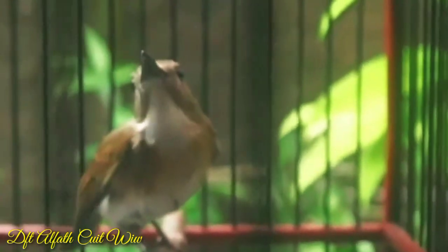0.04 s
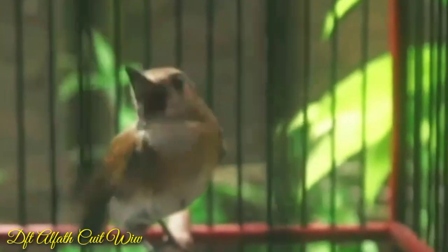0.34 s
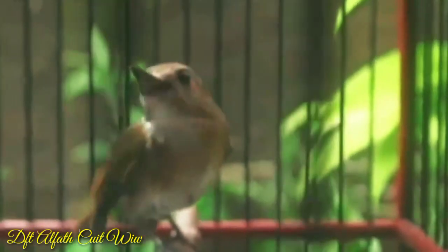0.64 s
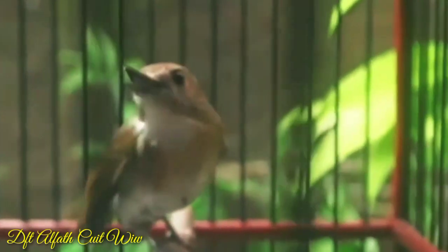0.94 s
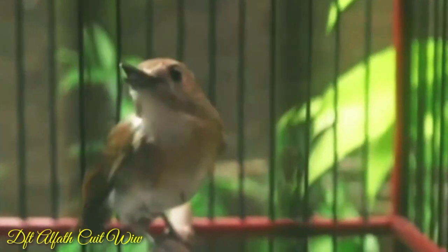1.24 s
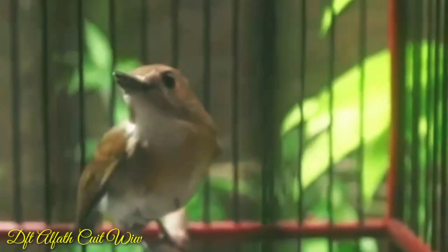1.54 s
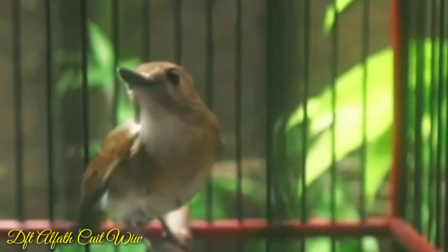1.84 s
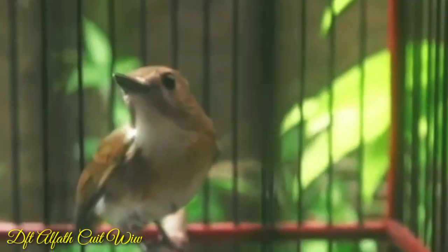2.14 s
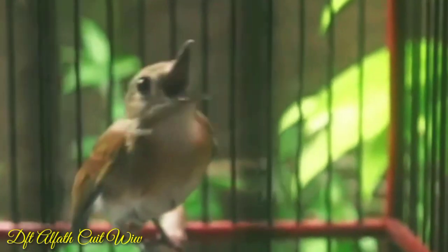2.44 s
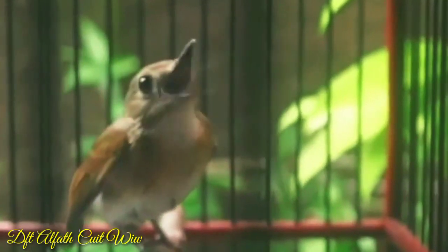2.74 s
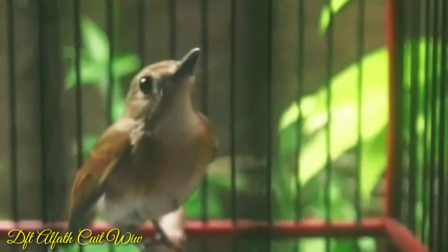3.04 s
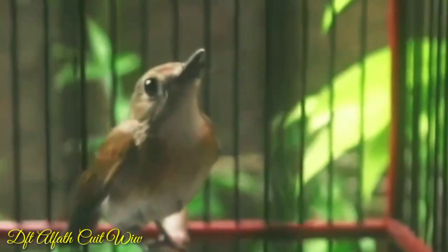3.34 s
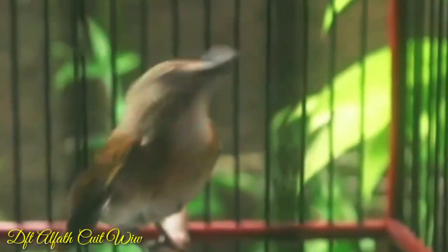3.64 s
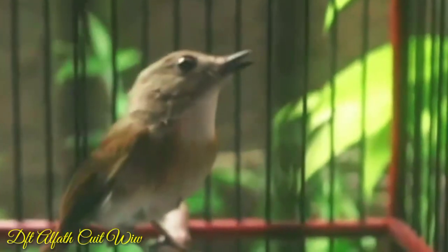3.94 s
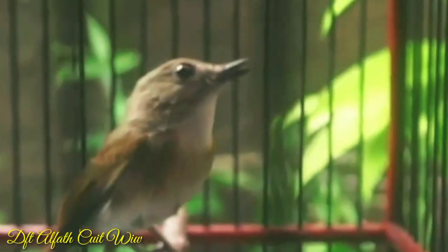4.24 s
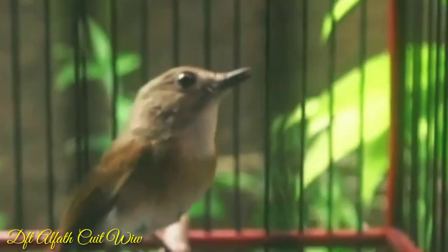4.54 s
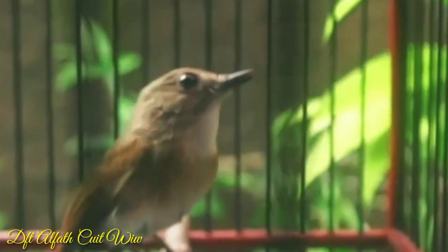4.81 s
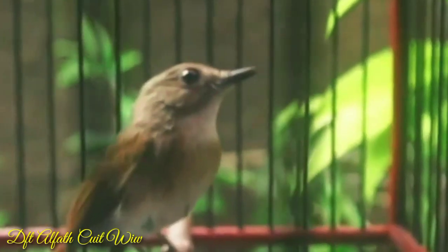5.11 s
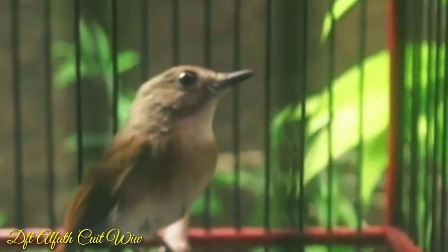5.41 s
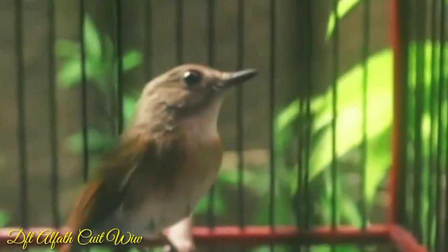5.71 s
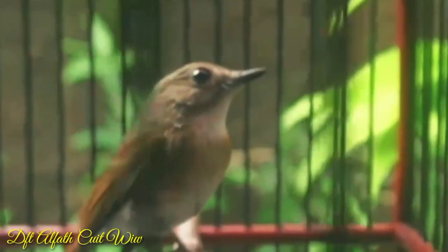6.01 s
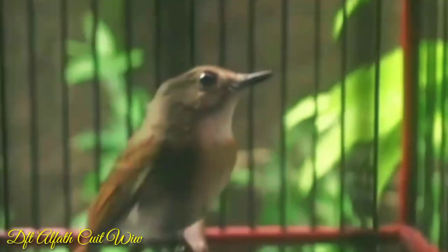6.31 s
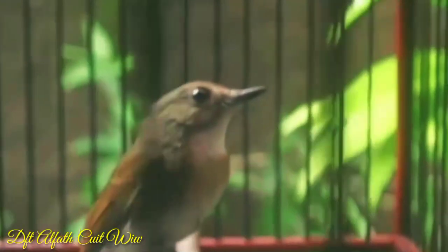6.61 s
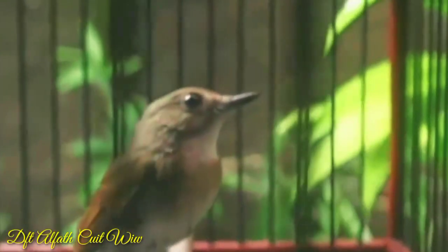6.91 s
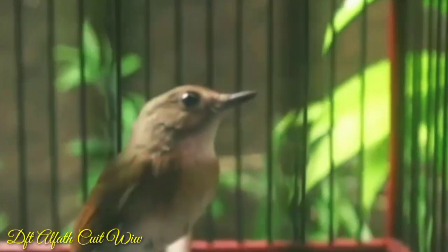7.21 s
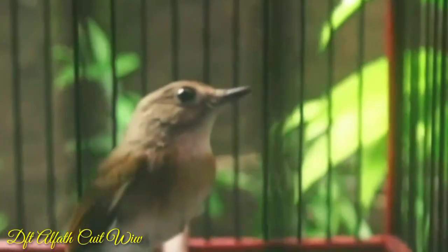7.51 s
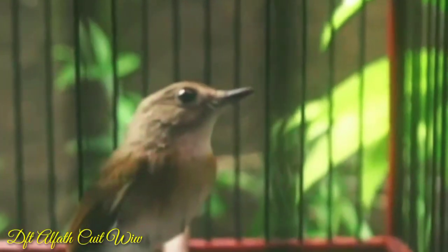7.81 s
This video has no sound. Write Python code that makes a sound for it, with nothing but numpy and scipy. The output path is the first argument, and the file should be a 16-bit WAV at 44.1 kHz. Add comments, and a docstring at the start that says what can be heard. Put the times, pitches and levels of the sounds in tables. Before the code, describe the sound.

Close, varied songbird phrases of whistles, warbled slurs and chirps end in a descending run, leaving a soft outdoor rush and faint calls.

```python
"""A yard, with a small caged songbird close by. Its syrinx makes a nearly pure tone whose changing pitch gives
whistles, a high buzz, warbled slurs, sharp chips and a long falling series; a few low, ringing chups sound
between its phrases. Cage and walls reflect each note, and the loudest overload the microphone. Other birds call
farther off; small rustles sound, and the soft background rush is heard louder once the song has ended."""
import sys
import numpy as np
from scipy import signal
from scipy.fft import rfft, irfft, next_fast_len
from scipy.io import wavfile

SR = 44100
rng = np.random.default_rng(int(sys.argv[2]) if len(sys.argv) > 2 else 0)


def unload_audio(sound):
    """Save the sound as a 16-bit wav file, at the path given as the first command line argument."""
    columns = np.transpose(np.atleast_2d(sound))
    # keep every value between -1 and 1, then stretch to whole-number steps
    steps = np.round(np.clip(columns, -1, 1) * 32767)
    wavfile.write(sys.argv[1], SR, steps.astype(np.int16))


N = 346626
TIME = np.arange(N) / SR

# Opening whistles. Each row: start and length in seconds, first and held pitch in Hz, time of the step,
# attack and release in seconds, relative level in dB, wobble in Hz, first sag in Hz/s, glide in seconds.
OPENING_WHISTLES = [(0.0, .07, 3660, 3820, 0.031, 0.044, 0.034, -6, 46, 1000, .006),
                    (0.132, .094, 3544, 2900, .04, 0.023, .025, -8.5, 100, 5000, .005),
                    (.27, .13, 2194, 2983, 0.035, 0.086, .05, -1.5, 15, 12000, 0.0063),
                    (0.426, 0.14, 1865, 3049, 0.037, .075, 0.078, -1, 10, 16000, 0.0082)]
# Lead-in and long note of the buzz. Each row: time in seconds, pitch in Hz, relative level in dB.
BUZZ_LEAD_IN = [(0.631, 7050, -9), (0.642, 7154, 1), (0.657, 7050, 0), (0.69, 8320, -0.5),
                (0.712, 8500, -17.5)]
BUZZ_LONG_NOTE = [(0.735, 7670, -14.5), (0.773, 8146, -3), (0.839, 8380, -10), (0.875, 8470, -5),
                  (0.915, 8860, -10), (0.975, 8485, -5), (0.989, 8770, -7), (0.995, 8820, -13)]
# Low, clean slurs. Each row: start and length in seconds, first and last pitch of the rise in Hz,
# attack in seconds, relative level in dB.
SCOOP_NOTES = [(1.053, .053, 3480, 4690, 0.039, 1), (1.345, .052, 4030, 4404, 0.035, -1),
               (1.605, .07, 3674, 4286, 0.037, -5)]
# Steep, fluttering slurs. Each row: as for the low slurs.
UPSWEEP_NOTES = [(1.163, 0.034, 5500, 6500, 0.0034, 1), (1.213, 0.056, 5320, 7710, 0.024, -1),
                 (1.41, 0.029, 4980, 6290, 0.0053, 1), (1.489, 0.057, 5270, 7280, 0.011, -3.5),
                 (1.688, 0.051, 4200, 5950, 0.025, -1), (1.774, .052, 4990, 7200, 0.018, -2.5)]
# Low chups, each a quick step down. Each row: start and length in seconds, first and held pitch in Hz,
# time of the step in seconds, relative level in dB.
CHUP_NOTES = [(2.116, 0.059, 3370, 2616, 0.02, -8.5), (2.235, .083, 2990, 2625, 0.04, -14),
              (2.427, 0.048, 3270, 2630, .016, -8)]
# Softer returns of a chup's held pitch. Each row: delay in seconds, gain in dB.
CHUP_RETURNS = [(.02, -11.5), (.052, -4.5)]
# Arched chips. Each row: start, length and rise time in seconds, first, top and last pitch in Hz,
# relative level in dB, flutter depth as a share of the pitch.
CHIP_NOTES = [(2.642, 0.075, .04, 4636, 7850, 6860, -1, .065),
              (2.795, 0.019, .01, 4620, 5480, 4780, 1.5, 0.04),
              (2.807, 0.045, 0.024, 4895, 8170, 6250, 0.5, 0),
              (2.95, 0.046, 0.028, 5180, 8144, 6750, -0.5, 0.0028),
              (3.087, 0.048, 0.025, 5760, 8400, 6800, -0.5, 0.0047),
              (3.439, 0.055, 0.025, 5500, 8790, 7450, -0.5, 0.0022),
              (3.619, 0.049, .026, 5590, 8900, 7470, -1, 0.008)]
# Syllables of the closing series. Each row: start and length in seconds, relative level in dB.
CLOSING_SYLLABLES = [(3.776, 0.064, -25), (3.824, .11, -15.5), (3.979, 0.041, -18), (4.018, 0.065, -15),
                     (4.064, 0.11, -9), (4.253, 0.033, -14.5), (4.287, 0.052, -13.5), (4.334, 0.061, -9),
                     (4.391, 0.042, -5.5), (4.504, 0.067, -10.5), (4.573, 0.061, -7.5),
                     (4.631, 0.055, -4.5), (4.742, 0.047, -9), (4.788, 0.057, -11.5), (4.846, 0.056, -8),
                     (4.9, 0.072, -9), (5.013, 0.043, -8.5), (5.061, 0.061, -14), (5.123, 0.046, -7.5),
                     (5.163, 0.04, -12), (5.198, 0.048, -5.5), (5.278, 0.03, -5)]
# The sinking line they follow. Each row: time in seconds, pitch in Hz.
CLOSING_PITCH = [(3.775, 3910), (3.83, 3625), (3.995, 3646), (4.045, 3263), (4.27, 3207), (4.42, 3085),
                 (4.65, 2952), (4.81, 2840), (4.93, 2850), (5.1, 2810), (5.31, 2769)]
# How throat and beak pass overtones. Each row: frequency in Hz, relative gain in dB.
THROAT_RESPONSE = [(4200, -6), (5800, -27.5), (9000, -33.5), (12000, -27), (15000, -30)]
# Air rushing through the beak. Each row: frequency in Hz, relative spectral density in dB.
BREATH_SPECTRUM = [(30, 6), (1000, -9.5), (5000, 1), (7000, -0.5), (10000, -2), (15000, -10.5)]
# Reflections from near surfaces. Each row: left and right delay in seconds, gain in dB.
REFLECTIONS = [(.0021, 0.0052, -23), (.0063, .0057, -18), (0.026, 0.024, -23), (.058, 0.064, -35.5)]
# Faint calls, and a soft falling flick under the songbird's first chip. Each row: start and length in
# seconds, first, middle and last pitch in Hz, relative level in dB, jitter in Hz, third harmonic in dB.
FAINT_CALLS = [(.225, 0.072, 1500, 1718, 1560, -36, 86, -10),
               (1.536, 0.29, 3475, 3305, 3233, -34.5, 20, -11),
               (2.207, 0.06, 1836, 1688, 1680, -34.5, 28, -9),
               (2.679, 0.037, 4990, 3920, 3100, -27.5, 110, -12),
               (2.749, 0.048, 1790, 1752, 1690, -33, 29, -12),
               (4.675, 0.062, 6570, 8390, 7500, -30, 400, -11),
               (6.533, 0.046, 1520, 1910, 2300, -35, 90, -8),
               (6.648, 0.043, 7930, 8220, 8640, -24.5, 116, -12),
               (6.817, 0.097, 1630, 2204, 2560, -36, 182, -8),
               (6.903, 0.12, 3513, 3468, 3368, -19.5, 17, -4.5),
               (7.07, 0.14, 3320, 3293, 3266, -18.5, 16.4, -5),
               (7.527, 0.09, 2206, 2052, 1606, -23, 38, 2.5)]
# One neighbour's dropping calls. Each row: start and length in seconds, relative level in dB.
DROPPING_CALLS = [(2.404, 0.11, -28), (2.975, 0.11, -39), (5.688, .095, -39), (6.127, .085, -33)]
# Rustles and scratches. Each row: start and length in seconds, band centre in Hz, level in dB.
SCRAPES = [(0.411, 0.019, 5560, -33.5), (0.642, 0.02, 1300, -37), (5.677, 0.083, 800, -39.5),
           (6.228, 0.028, 875, -35), (6.657, 0.023, 720, -36), (6.761, 0.052, 1040, -38),
           (7.307, 0.027, 5750, -33), (7.649, 0.022, 860, -29), (7.682, 0.031, 1770, -36),
           (7.78, 0.063, 5700, -30.5)]
# Sharp ticks. Each row: start in seconds, peak level in dB.
DRY_TICKS = [(5.308, -25), (6.581, -17.5), (7.344, -9), (7.36, -22), (7.732, -20)]
# Course of the outdoor rush. Each row: time in seconds, base levels of rumble and of air in dB.
RUSH_LEVELS = [(0, -55.5, -46), (2.299, -49.5, -46.5), (3.3, -56, -52), (4.598, -50, -45.5),
               (5.598, -48, -43), (7.86, -41, -34)]
# Its two spectra. Each row: frequency in Hz, relative spectral density in dB.
RUMBLE_SPECTRUM = [(15, -48), (25, -9), (43, -9), (112, 4), (257, -8), (313, -9.5), (350, -25.5),
                   (460, -37), (770, -120)]
AIR_SPECTRUM = [(200, -0.5), (700, -0.5), (1500, -0.5), (3000, -0.5), (6000, -5), (9000, -9.5),
                (15000, -13)]


def song_and_chups():
    """Modulated tones: the songbird's phrases, and a few low, ringing chups between them."""
    air = coloured(BREATH_SPECTRUM, side_db=-21.5)[0]
    out = ringing_chups(air)
    out += phrase([stepped(*row) for row in OPENING_WHISTLES], air, gain_db=-.5,
                  overtone_db=1, tilt_db=2.5, hiss_db=-41.5, jitter=.0083, shimmer_db=1.3)
    out += phrase([buzz(BUZZ_LEAD_IN), buzz(BUZZ_LONG_NOTE)], air, gain_db=1,
                  overtone_db=-12, tilt_db=-6, hiss_db=-49.5, jitter=.008, shimmer_db=1.6, pulse=119.5)
    out += phrase([scoop(*row) for row in SCOOP_NOTES], air, gain_db=0,
                  overtone_db=-5.5, tilt_db=-1, hiss_db=-42, jitter=.009, shimmer_db=2)
    out += phrase([upsweep(*row) for row in UPSWEEP_NOTES], air, gain_db=-.5,
                  overtone_db=-15.5, tilt_db=-6.5, hiss_db=-39, jitter=.012, shimmer_db=2.64, pulse=37)
    out += phrase([chip(*row) for row in CHIP_NOTES], air, gain_db=-.2,
                  overtone_db=-8, tilt_db=-5.5, hiss_db=-33, jitter=.007, shimmer_db=2.55)
    out += phrase([syllable(*row) for row in CLOSING_SYLLABLES], air, gain_db=.5,
                  overtone_db=-3, tilt_db=1.1, hiss_db=-40, jitter=.0043, shimmer_db=2.6)
    return out


def phrase(notes, air, gain_db, overtone_db, tilt_db, hiss_db, jitter, shimmer_db, pulse=0):
    """Coupled modulation: flutter moves pitch and level together, by pulse dB per unit of swing."""
    tone, airflow = np.zeros((2, N))
    for start, hz, effort, swing in notes:
        pitch = hz * (1 + swing + jitter * drift(397.7, len(hz)))
        effort = effort * from_db(gain_db + pulse * swing + shimmer_db * drift(161, len(hz)))
        add(tone, start, effort * whistle(pitch, overtone_db, tilt_db))
        add(airflow, start, effort)
    return tone + from_db(hiss_db) * airflow * air


def whistle(hz, overtone_db, tilt_db, rasp_radians=.22):
    """Source and filter: a near sine whose faint, raspy overtones are coloured by the throat."""
    phase = 2 * np.pi * np.cumsum(hz) / SR
    throat_hz, throat_db = np.transpose(THROAT_RESPONSE)
    out = np.sin(phase)
    for k in range(2, 6):
        db = np.interp(k * hz, throat_hz, throat_db) + overtone_db + tilt_db * (k - 5.5)
        gain = from_db(db) * (k * hz < SR / 2)
        out += gain * np.sin(k * phase + rasp_radians * drift(700, len(hz)))
    return out


def flutter(t, rate_hz, depth, unevenness=.032):
    """Frequency modulation: the syrinx swings the pitch rapidly, by a share of its value."""
    turns = np.cumsum(rate_hz * (1 + unevenness * drift(33, len(t)))) / SR
    return depth * np.sin(2 * np.pi * turns)


def stepped(start, length, first_hz, held_hz, step_after, attack, release, db,
            wobble_hz=0, first_sag=7000, glide=.0054):
    """A frequency step: a sinking whistle flips to a second pitch, which sags slowly."""
    held_sag, wobble_rate_hz = 300, 38   # sag in Hz/s
    t = note_time(length)
    since_step = t - step_after
    lead = first_hz - first_sag * (np.minimum(t, step_after * .7) - step_after / 2)
    held = held_hz - held_sag * since_step - wobble_hz * np.sin(2 * np.pi * wobble_rate_hz * since_step)
    hz = lead + (held - lead) * (1 + np.tanh(since_step / glide)) / 2
    loss_db = .02 * np.maximum(2790 - hz, 0)   # the voice weakens below 2790 Hz
    return start, hz, envelope(t, db - loss_db, attack, release), 0


def buzz(contour, clean_s=.033):
    """Fast modulation is heard as roughness: a high note starts clean and breaks into a flutter."""
    times, hz, db = np.transpose(contour)
    start = times[0]
    t = note_time(times[-1] - start)
    onset = np.clip(t / clean_s - .5, 0, 1)
    effort = envelope(t, np.interp(start + t, times, db), attack=.005, release=.005)
    return start, np.interp(start + t, times, hz), effort, flutter(t, rate_hz=136.2, depth=.033 * onset)


def scoop(start, length, start_hz, end_hz, attack, db, hook_s=.008, hook_share=.15):
    """A linear chirp: the slur swells, rises evenly and hooks down at its end."""
    t = note_time(length)
    hook = 1 - hook_share * np.clip(1 - (length - t) / hook_s, 0, 1)
    return start, np.linspace(start_hz, end_hz, len(t)) * hook, envelope(t, db, attack, release=.011), 0


def upsweep(start, length, start_hz, end_hz, attack, db, bend=1.55):
    """A modulated chirp: the pitch climbs in an S, and the flutter deepens toward the end."""
    t = note_time(length)
    hz = start_hz + (end_hz - start_hz) * np.sin(np.pi / 2 * (t / length) ** bend)
    swing = flutter(t, rate_hz=201.8, depth=.07 * np.sin(np.pi / 2 * t / length) ** 2, unevenness=.12)
    return start, hz, envelope(t, db, attack, release=.012), swing


def chip(start, length, top_after, start_hz, top_hz, end_hz, db, depth, bend=1.3):
    """An arched chirp: the pitch rises and falls partway back; any flutter sets in near the top."""
    t = note_time(length)
    up = np.minimum(t / top_after, 1)
    down = np.maximum(t - top_after, 0) / (length - top_after)
    rise_hz = (top_hz - start_hz) * np.sin(np.pi / 2 * up ** bend)
    fall_hz = (top_hz - end_hz) * np.sin(np.pi / 2 * down) ** 2
    swing = flutter(t, rate_hz=139.4, depth=depth * up ** 4)
    return start, start_hz + rise_hz - fall_hz, envelope(t, db, attack=.0145, release=.014), swing


def syllable(start, length, db, sag_hz_per_s=710, arch_hz=100):
    """Pitch rises with effort, so each piece of the sinking line arches as it droops."""
    t = note_time(length)
    swell = envelope(t, 0, attack=.018, release=.014, rounding=1.05)
    hz = np.interp(start + t, *np.transpose(CLOSING_PITCH)) - sag_hz_per_s * (t - length / 2)
    return start, hz + arch_hz * (swell - swell.mean()), from_db(db) * swell, 0


def ringing_chups(air, ring_hz=2620):
    """Narrow-band echo: each low chup steps down, and its held pitch comes back twice, softer."""
    chups = phrase([stepped(*row, attack=.018, release=.008, db=db) for *row, db in CHUP_NOTES], air,
                   gain_db=-1, overtone_db=-1, tilt_db=2.5, hiss_db=-33.5, jitter=.018, shimmer_db=3)
    ring = band(chups, ring_hz * .95, ring_hz * 1.05)
    return chups + sum(from_db(db) * np.interp(TIME - delay, TIME, ring) for delay, db in CHUP_RETURNS)


def near_echoes(song):
    """Early reflection: each near surface returns a weaker copy, with its own delay to each side."""
    return sum(from_db(db) * np.interp(TIME - [[left], [right]], TIME, song, left=0)
               for left, right, db in REFLECTIONS)


def yard_tail(x, t60, side_db, build_up):
    """Reverberation: echoes scattered by walls and leaves build up and decay exponentially."""
    t = TIME[:SR]
    response = band(stereo_noise(side_db, SR), 630, 7300)
    response *= from_db(-60 * t / t60) * (1 - np.exp(-t / build_up))
    response /= np.sqrt(np.sum(response ** 2, axis=1, keepdims=True))
    return signal.fftconvolve(np.atleast_2d(x), response, axes=1)[:, :N]


def faint_calls(series_start_s=3.328, period_s=.168, rasp_after_s=.081):
    """Weak chirps: scattered calls, and a far bird's periodic falling note with a rasp after each."""
    out = np.zeros(N)
    for start, *call in FAINT_CALLS:
        add(out, start, faint_call(*call))
    for start, length, db in DROPPING_CALLS:
        add(out, start, dropping_call(length, db))
    for start in series_start_s + period_s * np.arange(8):
        add(out, start, faint_call(.055, 2950, 2450, 2147, db=-38, jitter_hz=209))
        add(out, start + rasp_after_s, faint_call(.055, 5600, 5000, 4400, db=-41.5, jitter_hz=683))
    return out


def faint_call(length, start_hz, middle_hz, end_hz, db, jitter_hz, third_db=-6):
    """Nonlinearity: a whistle on a parabolic glide has more third harmonic the louder it is."""
    t = note_time(length)
    pitch = np.polyval(np.polyfit([0, length / 2, length], [start_hz, middle_hz, end_hz], 2), t)
    phase = 2 * np.pi * np.cumsum(pitch + jitter_hz * drift(700, len(t))) / SR
    effort = from_db(db) * fade(t, length, .016)
    return effort * (np.sin(phase) + from_db(third_db) * np.sqrt(effort) * np.sin(3 * phase))


def dropping_call(length, db, top_hz=4950, flick_hz=605, sag_hz=904, fall_hz=946, jitter_hz=45):
    """A downward chirp: the whistle flicks up, sags slowly and then falls away."""
    t = note_time(length)
    hz = top_hz - flick_hz * np.exp(-t / .0064) - sag_hz * t / length - fall_hz * (t / length) ** 5
    phase = 2 * np.pi * np.cumsum(hz + jitter_hz * drift(700, len(t))) / SR
    return envelope(t, db, attack=.014, release=.034) * np.sin(phase)


def rustles():
    """Noise bursts: a random envelope makes a grainy scrape, a fast exponential decay a dry tick."""
    out = np.zeros((2, N))
    for start, length, hz, db in SCRAPES:
        t = note_time(length)
        grains = band(stereo_noise(-29, len(t)), hz * .55, hz * 1.33)
        grains *= from_db(8.5 * drift(231.4, len(t)))
        add(out, start, from_db(db) * rms_one(grains) * fade(t, length, .0024))
    for start, db in DRY_TICKS:
        t = TIME[:SR // 100]
        tick = band(stereo_noise(-29, len(t)), 4500, 15700) * np.exp(-t / .0011)
        add(out, start, from_db(db) * tick / np.abs(tick).max())
    return out


def outdoor_rush(patchy_db=5, crackle_db=3):
    """Ambient noise: a low rumble, and a hiss that random amplitude modulation stirs and crackles."""
    times, rumble_db, air_db = np.transpose(RUSH_LEVELS)
    rumble = np.interp(TIME, times, from_db(rumble_db)) * coloured(RUMBLE_SPECTRUM, side_db=-10.5)
    air = coloured(AIR_SPECTRUM, side_db=-7)
    edges_hz = np.geomspace(400, 2400, 5)
    air += sum(band(air, low, high) * (from_db(patchy_db * drift(40)) - 1)
               for low, high in zip(edges_hz, edges_hz[1:]))
    air *= from_db(np.interp(TIME, times, air_db) + crackle_db * drift(280))
    return rumble * from_db([[-1], [1]]) + air


def from_db(db):
    """Amplitude grows tenfold every 20 dB."""
    return 10 ** (np.asarray(db) / 20)


def rms_one(x):
    """Normalisation to unit power."""
    return x / np.sqrt(np.mean(x ** 2) + 1e-20)


def drift(rate, size=N):
    """Random modulation of unit variance, with rate new values a second."""
    t = np.arange(size) * (rate / SR)
    knots = rng.standard_normal(int(t[-1]) + 2)
    return np.sqrt(3 / 2) * np.interp(t, np.arange(len(knots)), knots)


def band(x, low_hz, high_hz):
    """A band-pass with slopes of 12 dB per octave."""
    sos = signal.butter(2, [low_hz, min(high_hz, .45 * SR)], "band", fs=SR, output="sos")
    return signal.sosfilt(sos, x + 1e-18)


def stereo_noise(side_db, size=N):
    """Partial coherence: white noise mostly shared by the two sides."""
    mid, side = rng.standard_normal((2, size))
    return mid + from_db(side_db) * side * np.array([[1], [-1]])


def coloured(spectrum, side_db):
    """Spectral shaping of stereo noise, at unit power."""
    hz, db = np.transpose(spectrum)
    size = next_fast_len(N)
    bins = np.maximum(np.arange(size // 2 + 1) * SR / size, 1)
    gain = from_db(np.interp(np.log(bins), np.log(hz), db)) * np.minimum(bins / hz[0], 1) ** 2
    return rms_one(irfft(rfft(stereo_noise(side_db, size)) * gain, size)[:, :N])


def add(out, start, sound):
    """Superposition: a sound joins the mix at its start time."""
    i = max(round(start * SR), 0)
    out[..., i:i + sound.shape[-1]] += sound[..., :N - i]


def note_time(length):
    """Seconds since the onset of a note."""
    return np.arange(int(length * SR)) / SR


def fade(t, length, edge):
    """A raised-cosine taper at both ends."""
    return np.sin(np.pi / 2 * np.clip(np.minimum(t, length - t) / edge, 0, 1)) ** 2


def envelope(t, db, attack, release, rounding=1.08):
    """Amplitude envelope: attack, hold and release."""
    ramps = np.clip([t / attack, (t[-1] - t) / release], 0, 1)
    return from_db(db) * np.prod(np.sin(np.pi / 2 * ramps) ** rounding, axis=0)


def scene(low_pan_db=1.55):
    """Direct sound, echoes and background superpose; a level difference sets lower notes to the left."""
    song, faint, small = song_and_chups(), faint_calls(), rustles()
    near = song + near_echoes(song)
    low = signal.sosfiltfilt(signal.butter(2, 4800, fs=SR, output="sos"), near)
    near = near - low + low * from_db([[low_pan_db], [-low_pan_db]])
    song_tail = from_db(-21) * yard_tail(song, t60=.23, side_db=-17, build_up=.0056)
    faint_tail = from_db(.5) * yard_tail(faint + small, t60=.19, side_db=-4.5, build_up=.0033)
    return near + song_tail + faint * from_db([[1.5], [-1.5]]) + faint_tail + small + outdoor_rush()


def record(dry, lopsided=.013, stopband_hz=15850):
    """Asymmetric microphone distortion makes loud notes thump softly; the loudest clip; the top is cut."""
    bent = dry + lopsided * band(dry ** 2, 28, 21000)
    low_pass = signal.cheby2(14, 40, stopband_hz, fs=SR, output="sos")
    return signal.sosfilt(low_pass, np.clip(bent, -.99, .99))


dry = scene()
out = record(dry)
unload_audio(out)
```